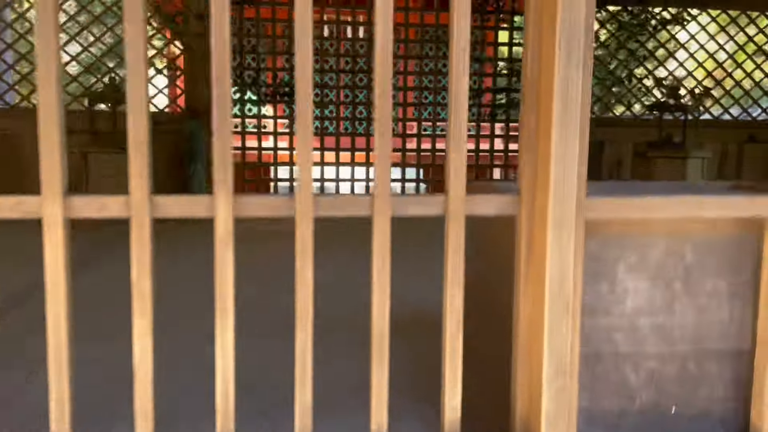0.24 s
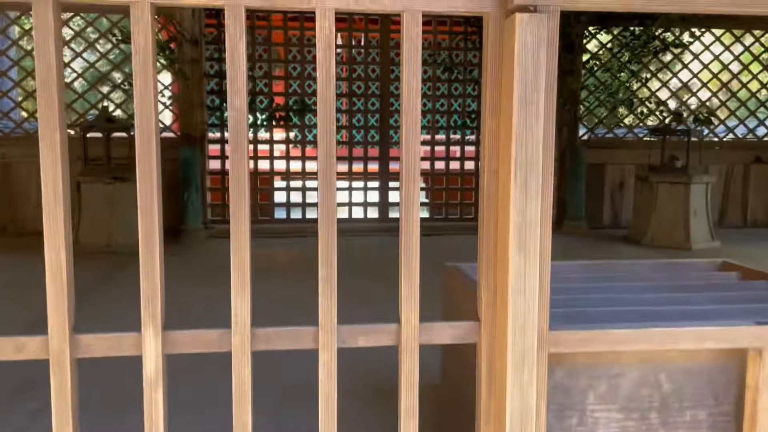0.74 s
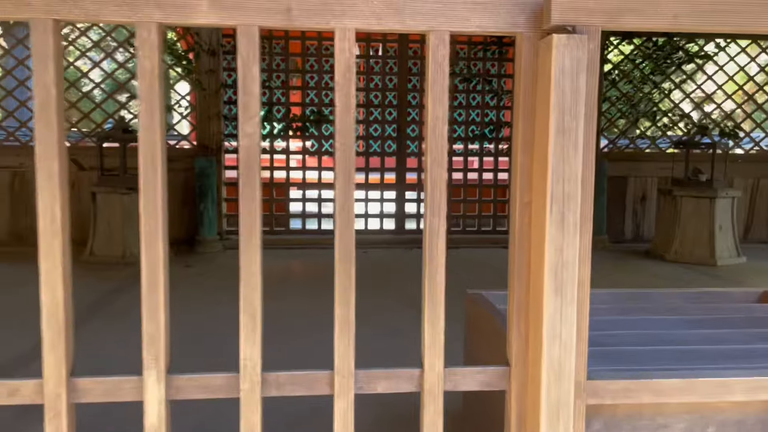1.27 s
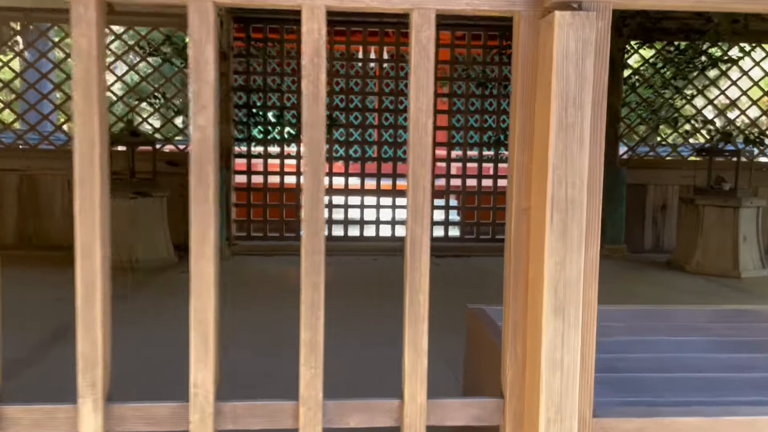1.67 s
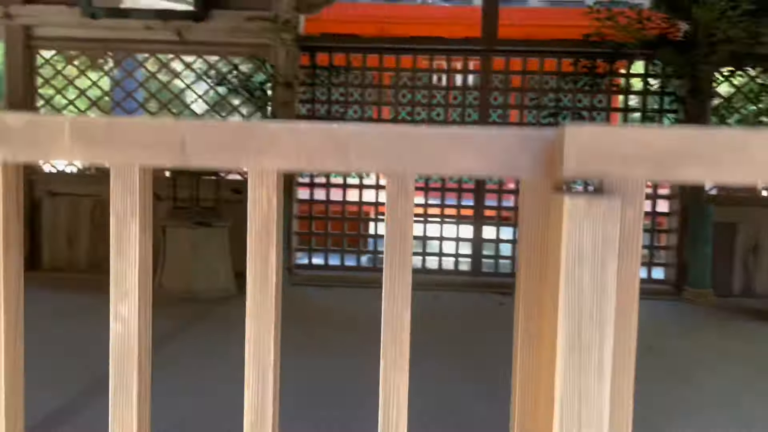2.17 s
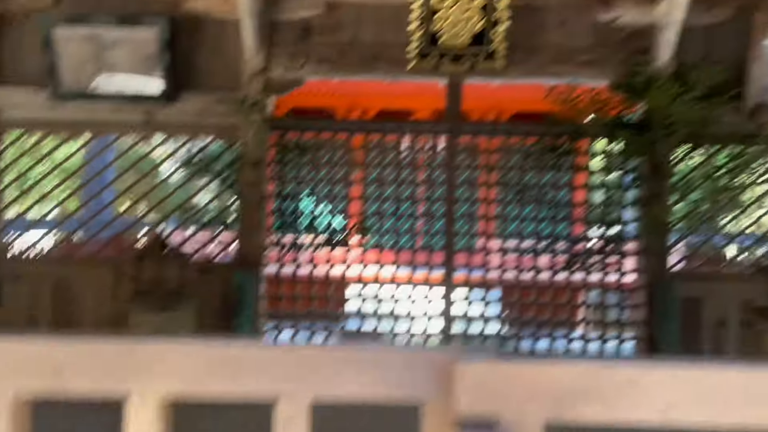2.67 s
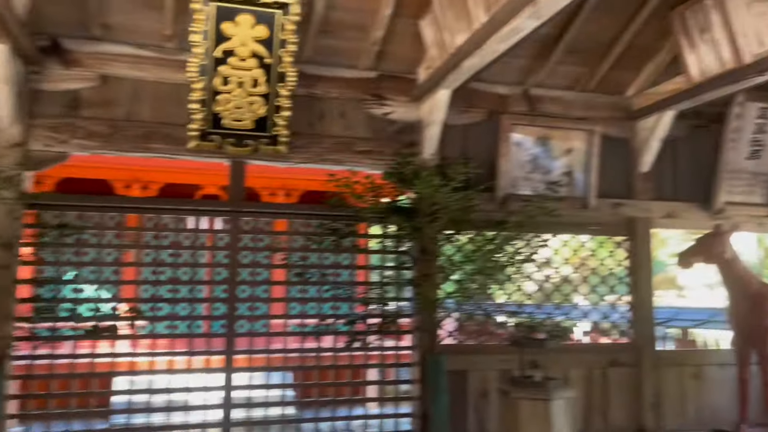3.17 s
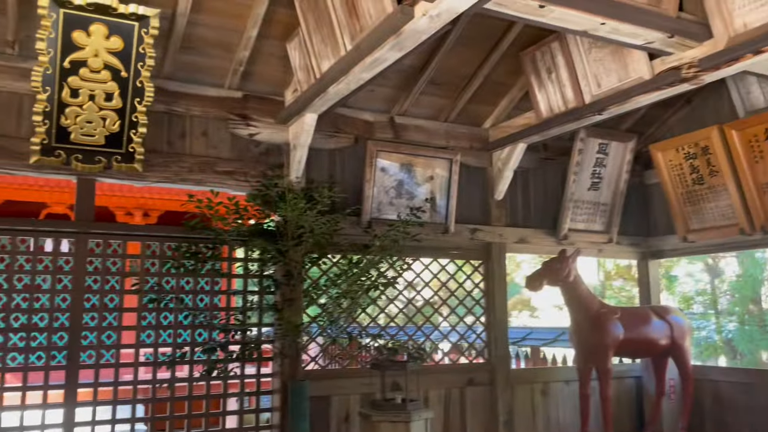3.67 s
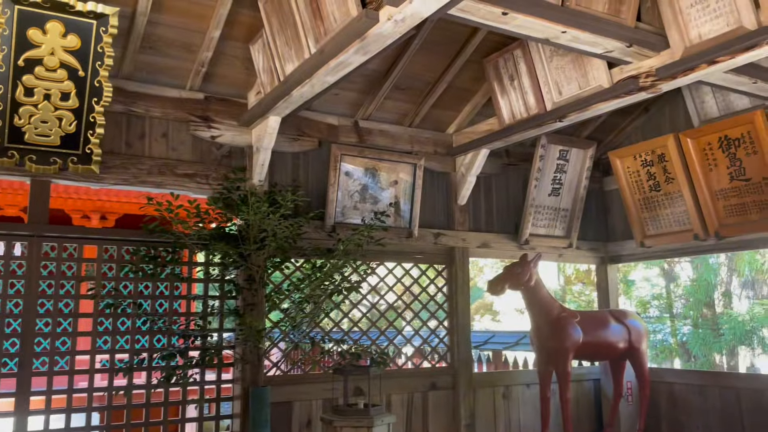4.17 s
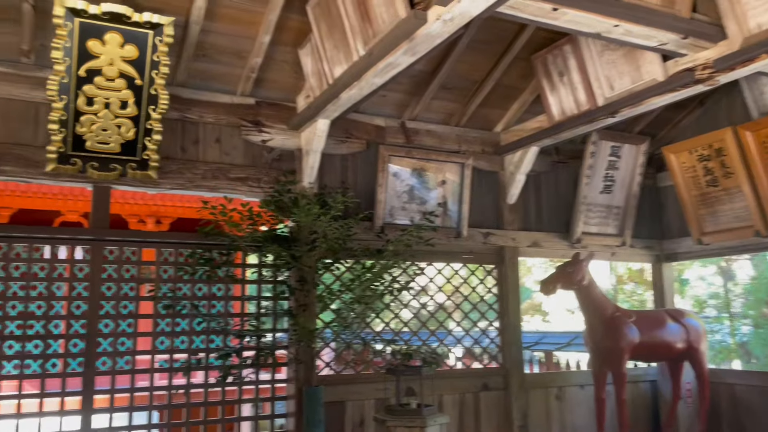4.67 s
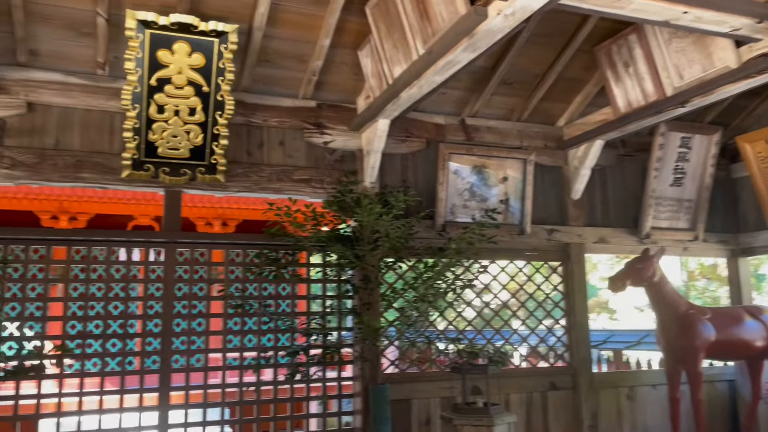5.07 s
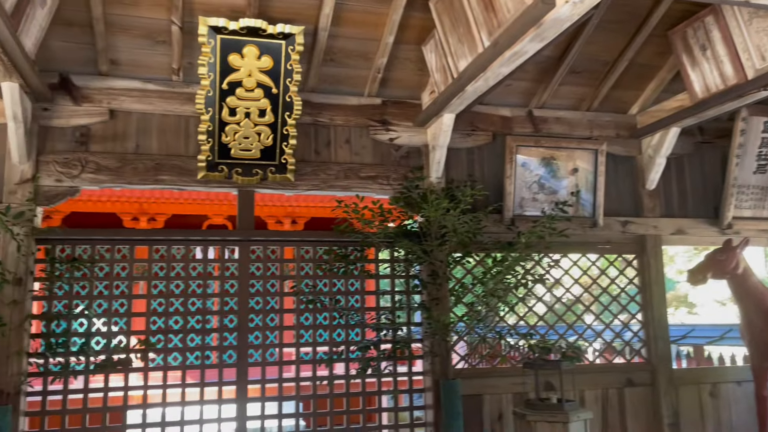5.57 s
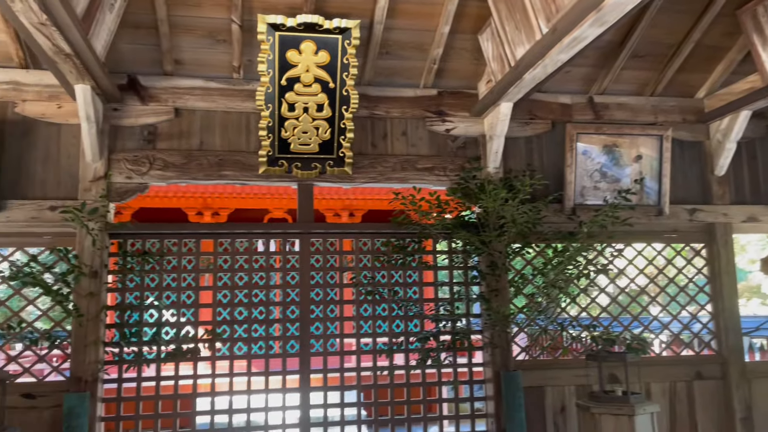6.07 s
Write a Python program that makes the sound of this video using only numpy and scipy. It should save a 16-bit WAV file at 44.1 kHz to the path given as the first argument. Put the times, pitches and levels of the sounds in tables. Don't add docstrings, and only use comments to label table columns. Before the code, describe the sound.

A phone held under a shrine's wooden roof hears a deep, uneven rumble of distant traffic and a faint machine drone throughout. From 0 to 1.3 seconds hoarse, noisy birds call in short rising chirps, with a far caw at 0.8, while a breeze in leaves dies away and a sleeve rustles thinly. Soft hand ticks come between 0.8 and 2.5, with faint whistles around 2. At 2.58 a coin cracks loudly on wooden slats an arm's length away, rings very high, rattles and slides with a low hollow hum, bouncing at 2.97 and 3.1. A second hard blow lands at 3.33, with a bright bounce at 3.49 and a shimmering spin sliding in until about 3.75. Then it is quiet: rumble, sparse thin bird whistles, especially near 5.6 and 6.2, a faint caw at 5.7, and car tyre hiss approaching after 6.1.

```python
import sys
import numpy as np
from scipy import signal
from scipy.fft import rfft, irfft
from scipy.io import wavfile
from scipy.ndimage import uniform_filter1d

SR = 44100
rng = np.random.default_rng(int(sys.argv[2]) if len(sys.argv) > 2 else 0)


def undo_db(level):
    steps = np.asarray(level, float) / 20
    return 10 ** steps


def wrap_up_sound(samples):
    columns = np.atleast_2d(samples).T
    tamed = np.clip(columns, -1, 1)
    steps = np.round(tamed * 32767).astype(np.int16)
    wavfile.write(sys.argv[1], SR, steps)


N = 278712
TIME = np.arange(N) / SR
BIN_HZ = np.fft.rfftfreq(N, 1 / SR)

SLAT_CHANGES = [2.9, 3.07, 3.3, 3.48]
# (frequency [Hz], width [Hz], level [dB])
SLAT_MODES = [
    [(971, 72, -9.5), (1160, 140, -8), (1760, 37, -9), (2020, 79, -7.5), (2810, 47, -3), (3790, 44, -4.5),
     (4260, 620, -12), (4950, 81, -25.5), (5800, 60, -6.5)],
    [(707.5, 45, -5), (970, 44, -9), (1272, 44, -0.5), (2104, 89, -20), (2716, 40, -4.5), (2950, 90, -0.5),
     (3820, 58, -7), (4000, 78, 4), (4640, 88, -5), (5050, 80, -5.5)],
    [(1200, 39.64, -3), (1980, 56, -23.5), (2190, 58, -17), (3150, 92, -10), (3500, 82, -10),
     (4000, 210, -5), (4430, 91.5, -9), (5850, 60, -15), (6400, 50, -7)],
    [(402.7, 34, 0.5), (960, 22, -2.5), (1744, 15, -6), (2200, 39, -6), (2804, 64, 5), (3040, 74, 4.5),
     (3370, 69, -1), (3370, 89, 3), (4175, 68, -6), (4726, 37.3, -11.5), (5600, 60, -13)],
    [(406, 21, -0.5), (919, 14, 4.5), (1281, 50, -0.5), (1675, 20, 3), (2154, 29, -2), (2500, 25, -10),
     (3010, 67, 8), (3360, 61, -2), (3700, 49.8, 0), (4450, 50, -5), (6790, 11, -17.5)],
]


def during(start_s, end_s):
    return slice(*np.searchsorted(TIME, [start_s, end_s]))


def noise():
    return rng.standard_normal((2, N))


def shape(table, hz, column=1):
    table = np.array(table)
    return undo_db(np.interp(np.log(hz + 1), np.log(table[:, 0]), table[:, column]))


def filtered(x, gain):
    size = x.shape[-1]
    y = irfft(rfft(x) * gain(np.fft.rfftfreq(size, 1 / SR)), size)
    return y / np.sqrt(np.mean(y ** 2))


def peak(hz, centre_hz, width_hz):
    return 1 / (1 + 1j * (hz ** 2 - centre_hz ** 2) / (hz + 1) / width_hz)


def band(hz, lo_hz, hi_hz):
    return 1 / np.sqrt((1 + (lo_hz / (hz + 1)) ** 8) * (1 + (hz / hi_hz) ** 8))


def swell(s, db, rise_s, hold_s, fade_db_s):
    top = s + rise_s
    held = top + hold_s
    return [(s, db - 16.5), (top, db), (held, db), (held + 60 / fade_db_s, db - 60)]


def gain_curve(curves, size=88):
    out = np.zeros(N)
    for curve in curves:
        s, db = np.transpose(curve)
        now = during(s[0], s[-1])
        out[now] += undo_db(np.interp(TIME[now], s, db))
    return uniform_filter1d(out, size)


def walk(rate):
    hold = int(SR / rate)
    levels = np.repeat(rng.standard_normal(N // hold + 1), hold)
    return 1.2 * uniform_filter1d(levels, hold)[:N]


def echo(x, t60, db, damp_hz):
    t = np.arange(SR) / SR
    tail = filtered(rng.standard_normal((2, SR)), lambda hz: 1 / (1 + hz / damp_hz))
    tail = tail * undo_db(-60 * t / t60)
    tail = tail / np.sqrt(np.sum(tail[0] ** 2))
    return x + undo_db(db) * signal.fftconvolve(x, tail, axes=1)[:, :N]


def ports(x, column, depth=1, lean=((1, 0), (2, 0))):
    # (frequency [Hz], side minus mid for near sound [dB], the same for the surroundings [dB])
    port_balance = [(60, -12, -15), (195, -15, -9), (570, -4, 2.5), (1200, -4, 3.5), (2260, -6, -4),
                    (4200, -10, -3.5), (6000, 0.5, -5.5), (6800, 8, 8), (7200, 25, 18), (7900, 21, 17),
                    (8400, 4, 5), (9600, -3, -9), (10300, -18, -20), (11650, -7, -15), (12200, -12, -14),
                    (12900, -4, -4), (13400, -3, -2.5)]
    ratio = shape(port_balance, BIN_HZ, column) ** depth
    total = np.sqrt(1 + ratio ** 2)
    shared = np.clip(np.interp(BIN_HZ, *np.transpose(lean)), -.9, .9)
    mid, side = rfft(x)
    side = np.sqrt(1 - shared ** 2) * side + shared * mid
    mid, side = irfft(mid / total, N), irfft(side * ratio / total, N)
    return np.array([mid + side, mid - side])


def outdoor_air(lo_hz, hi_hz):
    # (frequency [Hz], level per Hz [dB])
    air_colour = [(12, -57.5), (20, -31), (43, -18.5), (71, -4.5), (114, -16.5), (158, -23), (181, -22),
                  (361, -30.5), (392, -33.5), (438, -30), (503, -30), (546, -32.5), (974, -38),
                  (4430, -43.5), (14500, -61)]
    return filtered(noise(), lambda hz: shape(air_colour, hz) * band(hz, lo_hz, hi_hz))


def traffic_rumble():
    # (time [s], level [dB])
    surges = [(0.115, -32.5), (.3, -47), (0.828, -33.5), (1.711, -37.5), (2.57, -43.5), (2.981, -36),
              (3.542, -39.5), (4.071, -41), (4.56, -35), (4.948, -40.5), (5.209, -43), (5.982, -33)]
    surge = gain_curve([swell(s, db, rise_s=0.0057, hold_s=0, fade_db_s=76.5) for s, db in surges])
    return np.hypot(undo_db(-42), surge) * outdoor_air(30, 156)


def machinery():
    # (frequency [Hz], width [Hz], level [dB])
    drones = [(56, 14, -54), (152.4, 2.9, -54.5), (256.6, 5.8, -67.5), (378.3, 49, -67.5)]
    out = 0
    for drone_hz, width_hz, db in drones:
        out = out + undo_db(db) * filtered(noise(), lambda hz: peak(hz, drone_hz, width_hz) ** 2)
    return out


def breeze():
    murmur_db = -56 + 3 * np.exp(-TIME / 1.6)
    leaves_db = -70 + 12.5 * np.exp(-TIME / 0.74)
    murmur = undo_db(murmur_db + .5 * walk(8.5)) * outdoor_air(140, 1490)
    return murmur + undo_db(leaves_db + .5 * walk(8.5)) * outdoor_air(2000, 9000)


def bird_chorus():
    out = 0
    for centre_hz in [2300, 3600, 4600]:
        patch = filtered(noise(), lambda hz: peak(hz, centre_hz, 890) ** 2)
        out = out + undo_db(-77.5 + 2.56 * walk(5.3)) * patch
    return out


def approaching_car():
    gain = gain_curve([swell(6.13, -61, rise_s=0.07, hold_s=1, fade_db_s=20)])
    return gain * filtered(noise(), lambda hz: band(hz, 670, 6600) / np.sqrt(hz + 900))


def sleeve():
    # (time [s], level [dB])
    rustle = [(0, -63.5), (1.0, -77.5), (1.3, -70.5), (1.8, -73.5), (2.55, -68.5), (3, -84), (3.8, -86),
              (6.32, -81)]
    db = np.interp(TIME, *np.transpose(rustle))
    return undo_db(db + .5 * walk(8.5)) * outdoor_air(8300, 9300)


def birds(calls, clear, rasp_hz, settle, form):
    out = np.zeros(N)
    rasp = filtered(noise(), lambda hz: 1 / (1 + (hz / rasp_hz) ** 2))
    loudest, onset_db, end_db = form
    for s, length_s, first_hz, last_hz, db in calls:
        now = during(s - .002, s + length_s + .002)
        left = np.clip(1 - (TIME[now] - s) / length_s, 0, 1)
        pitch_hz = last_hz + (first_hz - last_hz) * left ** settle
        phase = 2 * np.pi * np.cumsum(pitch_hz) / SR
        level = [(s, db + onset_db), (s + loudest * length_s, db), (s + length_s, db + end_db)]
        voice = (clear + rasp[0, now]) * np.sin(phase) + rasp[1, now] * np.cos(phase)
        out[now] += gain_curve([level])[now] * voice
    overtone = 0.1 * out ** 2 / np.abs(out).max()
    return np.array([out + overtone, 0.89 * out])


def far_crow():
    # (time [s], length [s], first pitch [Hz], last pitch [Hz], level [dB])
    caws = [
        (.8, 0.22, 1117, 1490, -58.5),
        (5.72, 0.157, 1053, 1124, -67.5),
    ]
    return echo(birds(caws, clear=0.11, rasp_hz=230, settle=0.77, form=(0.2, -11.5, -8)), 1.0, -1.0, 9000)


def far_whistles():
    # (time [s], length [s], first pitch [Hz], last pitch [Hz], level [dB])
    whistles = [(1.82, 0.13, 4340, 5050, -71), (1.96, 0.086, 4380, 4870, -70),
                (2.09, 0.22, 3600, 3620, -77), (2.28, 0.17, 4000, 4620, -69), (2.33, 0.13, 4840, 5150, -71),
                (2.22, 0.14, 3700, 4050, -68.5), (2.3, 0.23, 3660, 3800, -72),
                (3.11, 0.1, 3800, 4740, -65.5), (3.16, 0.052, 4760, 4830, -57),
                (3.21, 0.15, 4700, 4800, -66), (3.92, .1, 5400, 5480, -74), (4.15, 0.16, 5800, 5760, -77.5),
                (4.2, 0.12, 4430, 4800, -74), (4.28, 0.16, 3550, 3740, -72.5),
                (5.045, 0.095, 3750, 3600, -71), (5.125, 0.17, 3250, 4620, -69),
                (5.49, 0.14, 3950, 5450, -72), (5.59, 0.15, 5370, 5400, -70),
                (5.59, 0.08, 3250, 3620, -62.5), (5.66, 0.17, 3600, 3620, -79),
                (6.2, 0.3, 3680, 3830, -62.5)]
    calls = birds(whistles, clear=0.27, rasp_hz=85, settle=5.0, form=(0.31, -7.5, -5))
    return echo(calls * undo_db(0.5), 0.44, -2.0, 9000)


def hoarse_birds():
    # (time [s], length [s], first pitch [Hz], last pitch [Hz], level [dB])
    hoarse_calls = [(-.03, 0.097, 4990, 4580, -46.5), (-.025, 0.056, 3320, 3660, -46),
                    (.15, 0.15, 2750, 7940, -46.5), (.165, 0.15, 4200, 5430, -49.5),
                    (.32, 0.045, 2500, 3600, -54), (.465, 0.092, 2764, 6010, -49),
                    (.66, 0.15, 7400, 8850, -66.5), (.87, 0.15, 7550, 8270, -63.5),
                    (1.08, 0.19, 7800, 7500, -62), (1.1, 0.056, 2690, 4950, -52),
                    (1.13, 0.1, 4580, 5200, -51.5), (1.16, 0.078, 5600, 6600, -58),
                    (1.235, 0.026, 3800, 2570, -52.5), (1.262, 0.027, 3500, 3380, -56.5),
                    (.485, 0.09, 4290, 5170, -52), (1.8, 0.27, 2656, 3360, -71.5),
                    (2.1, 0.45, 2300, 3010, -72.5), (5.585, 0.07, 8190, 7680, -65)]
    calls = birds(hoarse_calls, clear=0.078, rasp_hz=483, settle=1.8, form=(0.2, -11.5, -8))
    return echo(calls, 0.67, -0.21, 14000)


def boards(hz, slat, ring):
    hollow = (274.3, 19, -8.5)
    modes = SLAT_MODES[slat] + [hollow]
    return 1 + ring * sum(undo_db(db) * peak(hz, mode_hz, 1.9 * width_hz) for mode_hz, width_hz, db in modes)


def knocks(events, ring, rise_s, crack, t60, soft=0, size=8192):
    out = np.zeros((2, N + size))
    t, hz = np.arange(size) / SR, np.fft.rfftfreq(size, 1 / SR)
    for s, db, thump_db, knock_db, tick_db in events:
        contacts = rng.standard_normal((2, size))
        struck = contacts * (1 - np.exp(-t / rise_s)) ** 2
        first = struck * crack * undo_db(0.5 * (db + 15) - 60 * t / 0.011)
        rattle = struck * undo_db(-60 * t / t60)
        colour = undo_db(thump_db + 21.0) * band(hz, 220, 640)
        colour = colour + undo_db(knock_db + 14.5) * band(hz, 910, 2200)
        colour = colour + band(hz, 2200, 5000 * undo_db(min(soft * (db + 25.5), 0)))
        treble = rfft((first + rattle) * undo_db(-60 * t / 0.15))
        tick = undo_db(tick_db + 17.5) * band(hz, 6900, 9000) * treble
        slat = np.searchsorted(SLAT_CHANGES, s)
        spot_hz = hz * (1 + 0.015 * contacts[0, 0])
        wood = rfft(first) * boards(hz, slat, ring)
        wood = wood + 1.24 * rfft(rattle) * boards(spot_hz, slat, 0.63 * ring)
        blow = irfft(wood * colour + 2 * tick, size)
        middle = irfft(rfft(blow[0]) * band(hz, 2000, 4910), size)
        start = int((s - 1.3 * rise_s) * SR)
        out[:, start:start + size] += blow * undo_db(db) / np.abs(middle).max()
    return out[:, :N]


def hand():
    # (time [s], peak [dB], thump [dB rel], knock [dB rel], tick [dB rel])
    ticks = [(0.7634, -46.5, -7, -4, -15), (0.9044, -52, 13, 14.5, -29), (0.9944, -56.5, 2, -22, -22),
             (1.262, -49, -14, -15, -23), (1.5334, -45, -4, -11, -14), (1.6516, -57, 8.5, -2, -20),
             (1.7534, -58, 2, -6, -13), (2.1014, -56, -17, -12, -27), (2.4703, -49, -10.5, -16, -17.5),
             (2.4877, -51.5, 2, -7, -14), (3.884, -68, -22.5, -20, -4), (4.8354, -79.5, -3, -11, -27.5),
             (5.6794, -58, -17, -37, -17.5)]
    return knocks(ticks, ring=1.0, rise_s=0.0038, crack=.5, t60=0.15)


def coin_slide():
    # (time [s], scrape [dB], hold [s], box hum [dB rel], brightness [dB])
    slides = [
        (2.596, -30.5, 0.0061, -30.5, -18.5),
        (2.675, -48.5, 0.14, 8, -17.5),
        (2.97, -38, 0.0041, -14, -43.5),
        (3.118, -42, 0.0039, -28, -23.5),
        (3.374, -41.5, 0.003, -17, -10.5),
        (3.486, -35.5, 0.00574, -28.5, -5.5),
        (3.542, -49, 0.13, -16, -16),
    ]
    # (frequency [Hz], width [Hz], level [dB])
    hum_modes = [(190, 22, 1), (257, 18, 0)]
    # (frequency [Hz], level per Hz [dB])
    scrape_colour = [(180, -30.5), (300, 1), (697, -8.5), (944, -2.5), (1950, -11.5), (3010, -9),
                     (5900, -19.5), (7000, -32.5), (9100, -60), (15400, -120)]
    grit = noise() * undo_db(2.5 * walk(400) + 2.2 * walk(120))
    fine = filtered(grit, lambda hz: band(hz, 7600, 11200))
    hum = filtered(rng.standard_normal(N) * np.array([[1], [.5]]),
                   lambda hz: sum(undo_db(db) * peak(hz, mode_hz, width_hz) ** 2
                                  for mode_hz, width_hz, db in hum_modes))
    scrapes = []
    for slat in range(len(SLAT_MODES)):
        scrapes.append(filtered(grit, lambda hz: shape(scrape_colour, hz) * boards(hz, slat, 0.14)
                                * band(hz, 320, 8000)))
    out = 0
    for s, db, hold_s, hum_db, fine_db in slides:
        sound = scrapes[np.searchsorted(SLAT_CHANGES, s)] + undo_db(fine_db) * fine + undo_db(hum_db) * hum
        out = out + gain_curve([swell(s, db, 0.0027, hold_s, fade_db_s=176)], size=500) * sound
    return out


def offertory_box():
    # (time [s], peak [dB], thump [dB rel], knock [dB rel], tick [dB rel])
    coin_knocks = [(2.572, -38.5, -21, -9, -25), (2.576, -34.5, -15.5, -9, -27.5),
                   (2.581, -24.5, -13.5, -2, -23.5), (2.5855, -9.5, -16, -9.5, -11.5),
                   (2.5911, -18, -7.5, -10, -17), (2.611, -32.5, -21.5, -7, -21),
                   (2.638, -37.5, -16.5, -17, -18), (2.6931, -31.5, -4.5, 17, -28),
                   (2.6985, -32, -4, 7.5, -32), (2.707, -34, -6, -5, -28), (2.7274, -30, -1, -2, -39.5),
                   (2.7756, -29.5, -14, -13.5, -21), (2.7924, -31.5, -23.5, -15, -19.5),
                   (2.8, -34.5, -14, -9.5, -26), (2.806, -41.5, -16, -8.5, -16),
                   (2.822, -42.5, -9.5, -8, -25), (2.8606, -42, -6, -4, -35), (2.9153, -37, -8, 0, -39),
                   (2.921, -38.5, -12, -1, -40), (2.938, -41, -18.5, -5, -33), (2.9655, -12, -22, -5, -50),
                   (2.972, -39, -18, -1, -42), (3.0833, -27.5, -19, 2.5, -25),
                   (3.0934, -20, -20.5, -16.5, -30), (3.1001, -27, -27.5, -6, -30.5),
                   (3.1582, -30.5, -11, -11.5, -26), (3.2031, -41, -15.5, -13, -34),
                   (3.322, -48, -11.5, -15, -22), (3.3323, -8, -20, -28, -13), (3.335, -16.5, -1, -1, -30),
                   (3.352, -37.5, -12, -13, 1), (3.3818, -35, -10.5, -25, -6), (3.39, -31, -15, -10, -11.5),
                   (3.4875, -17, -16.5, -4.5, -11.5), (3.512, -29.5, -28, -14, -23),
                   (3.5282, -43, -26, -3, -8), (3.5953, -36.5, -30, -5, -14), (3.6315, -38, -20, -4.5, -9),
                   (3.6443, -38, -4, -9, -6), (3.651, -30.5, -12, -2, -8), (3.685, -47, -4, -7, -3)]
    # (frequency [Hz], share of the side that follows the mid, left positive)
    box_lean = [(300, -.35), (700, .1), (1300, -0.23), (2600, .4), (5500, 0.42), (9000, -0.18)]
    blows = knocks(coin_knocks, ring=4.8, rise_s=0.0016, crack=5.5, t60=0.063, soft=0.43)
    return ports(echo(blows, .35, -12, 5600) + coin_slide(), column=1, lean=box_lean)


def coin_ring():
    # (frequency [Hz], lead of the left port [rad], flicker [dB], flicker rate [1/s])
    coin_modes = [
        (12975, -1.75, 1.3, 140),
        (11652, -.45, 3.5, 250),
        (7740, 2.6, 4., 400),
    ]
    mode_db = [9, -0.5, 6.8]
    # (time [s], level [dB])
    high_ring = [
        [(2.582, -31), (2.594, -20.5), (2.62, -37.5), (2.658, -34), (2.716, -46)],
        [(2.724, -50), (2.74, -47), (2.756, -60)],
        [(2.76, -61), (2.78, -52), (2.818, -57), (2.916, -75), (2.96, -72)],
        [(2.962, -65), (2.98, -65), (3.01, -66), (3.04, -85), (3.064, -78), (3.08, -70)],
        [(3.085, -67), (3.119, -58), (3.147, -76), (3.161, -70), (3.215, -66), (3.3, -95)],
        [(3.328, -33.5), (3.342, -27), (3.366, -41.5), (3.386, -28), (3.4, -33), (3.432, -42), (3.485, -53)],
        [(3.487, -51), (3.51, -49)],
        [(3.523, -42), (3.541, -42), (3.587, -51), (3.6, -47)],
        [(3.6, -39), (3.612, -47), (3.638, -54), (3.674, -49), (3.69, -51)],
        [(3.695, -61), (3.763, -85), (3.82, -98)],
    ]
    middle_ring = [
        [(3.335, -33), (3.369, -38), (3.393, -39), (3.461, -82), (3.48, -61)],
        [(3.49, -61), (3.534, -38), (3.57, -63), (3.614, -47), (3.66, -57), (3.674, -74), (3.76, -93)],
    ]
    low_ring = [
        [(2.6, -62), (2.64, -43.5), (2.71, -51.5), (2.8, -51), (2.89, -67.5), (2.95, -79)],
        [(2.98, -69.5), (3.02, -52.5), (3.045, -60), (3.075, -70)],
        [(3.1, -66), (3.19, -67), (3.24, -83)],
        [(3.35, -66), (3.42, -51), (3.48, -62)],
        [(3.5, -56), (3.56, -67), (3.6, -67), (3.68, -52), (3.72, -63), (3.8, -89)],
    ]
    out = 0
    for mode, curves, db in zip(coin_modes, [high_ring, middle_ring, low_ring], mode_db):
        hz, lead, flicker_db, rate = mode
        phase = 2 * np.pi * (rng.random() + TIME * hz) + lead / 2 * np.array([[1], [-1]])
        flicker = flicker_db * (walk(rate) + walk(rate / 2)) / np.sqrt(2)
        out = out + np.sin(phase) * gain_curve(curves) * undo_db(db + flicker)
    return out


def scene():
    surroundings = traffic_rumble() + machinery() + breeze() + bird_chorus() + approaching_car() + sleeve()
    trees = far_crow() + far_whistles() + hoarse_birds()
    far = ports(surroundings, column=2) + ports(trees, column=1, depth=0.45)
    return far + ports(hand(), column=1) + offertory_box() + coin_ring()


def roll_off(x):
    return signal.sosfilt(signal.butter(12, 14770, fs=SR, output="sos"), x)


def record(dry):
    top = signal.cheby2(7, 26, 13900, fs=SR, output="sos")
    return roll_off(signal.sosfilt(top, dry))


dry = scene()
out = record(dry)
wrap_up_sound(out)
```